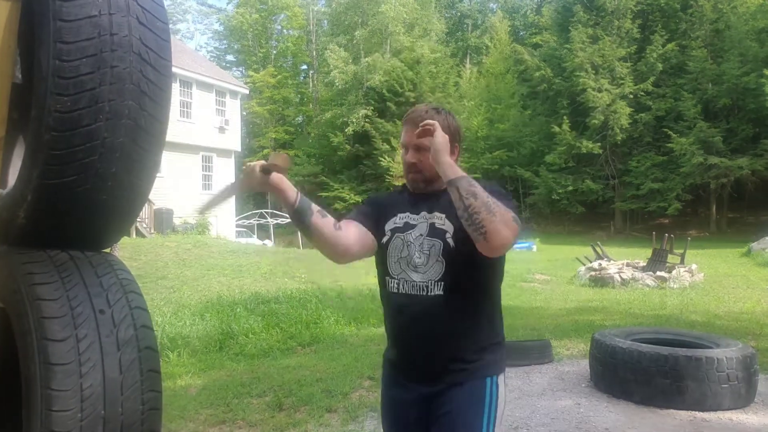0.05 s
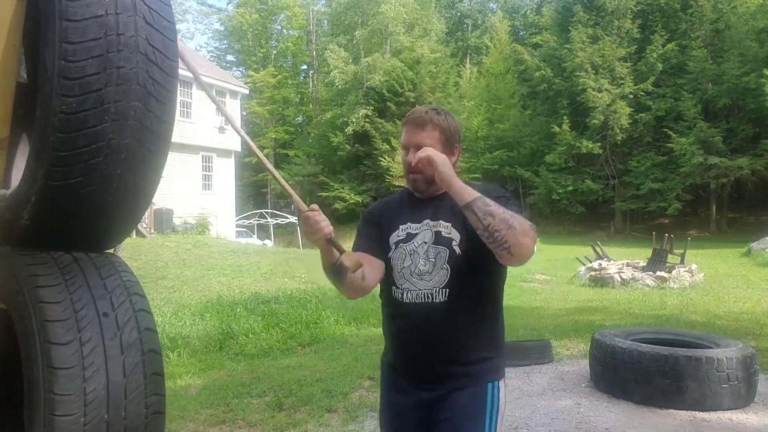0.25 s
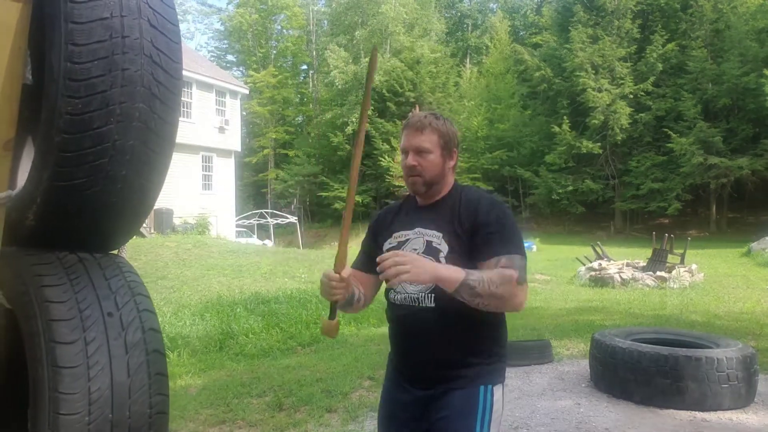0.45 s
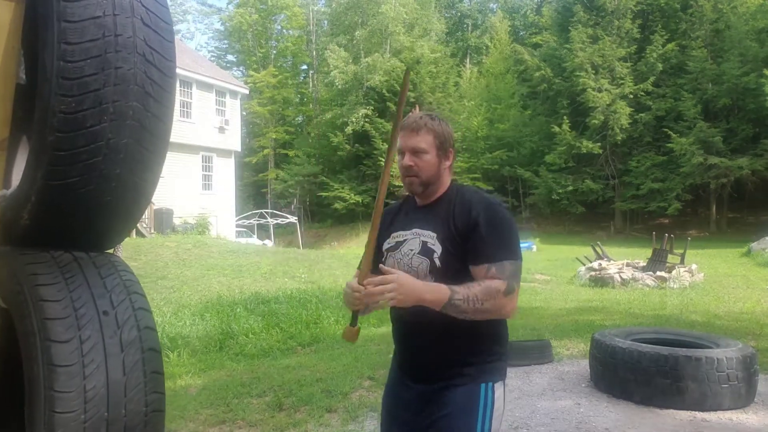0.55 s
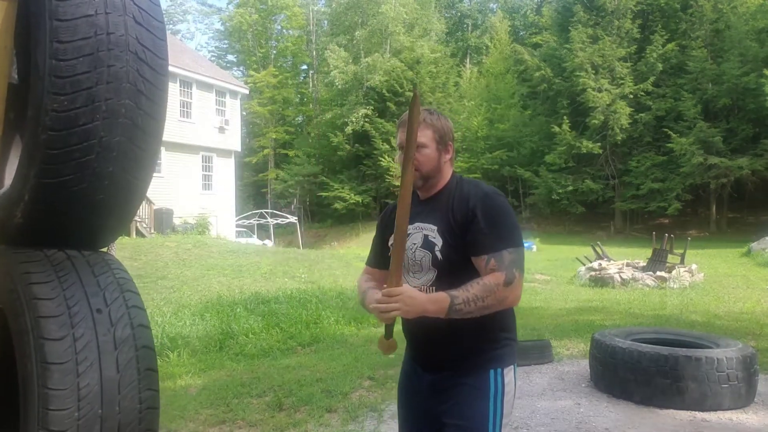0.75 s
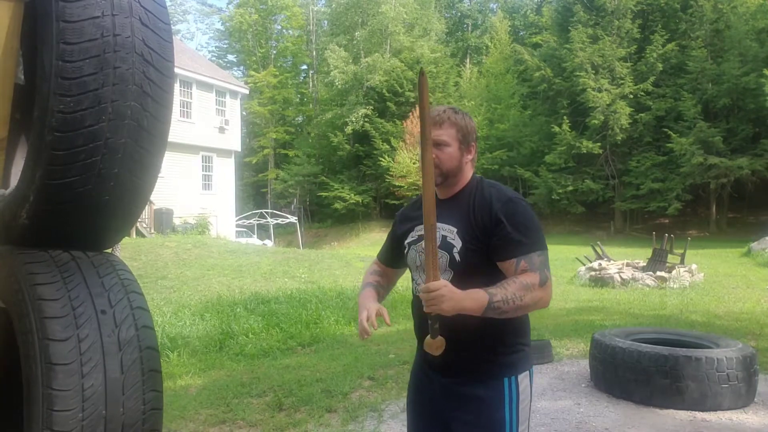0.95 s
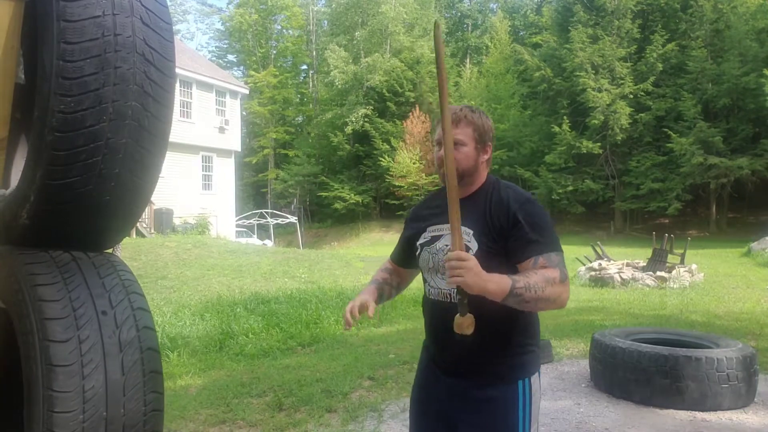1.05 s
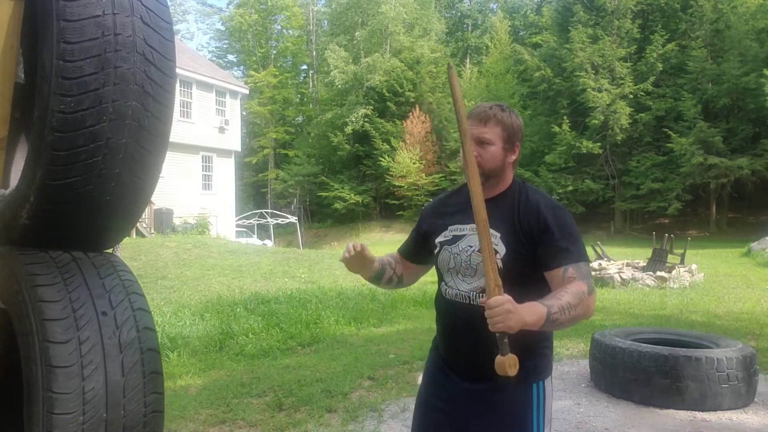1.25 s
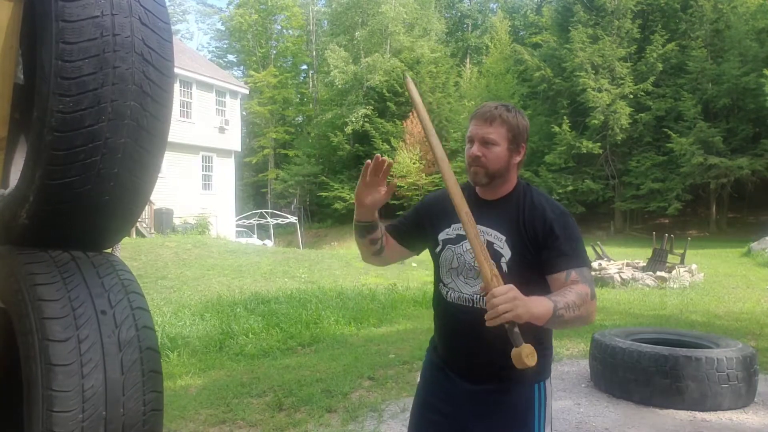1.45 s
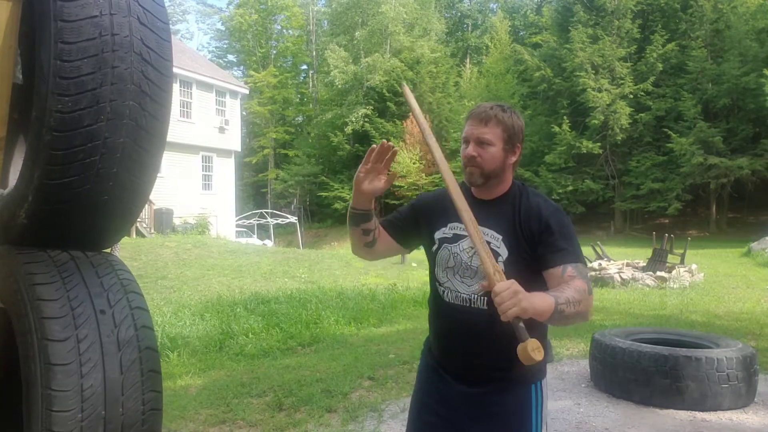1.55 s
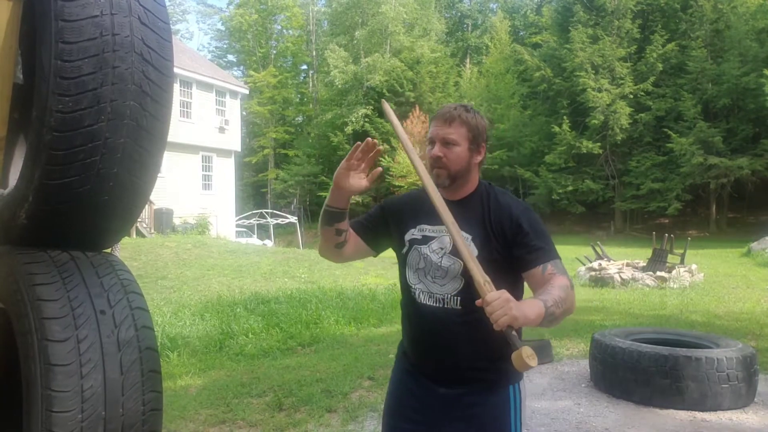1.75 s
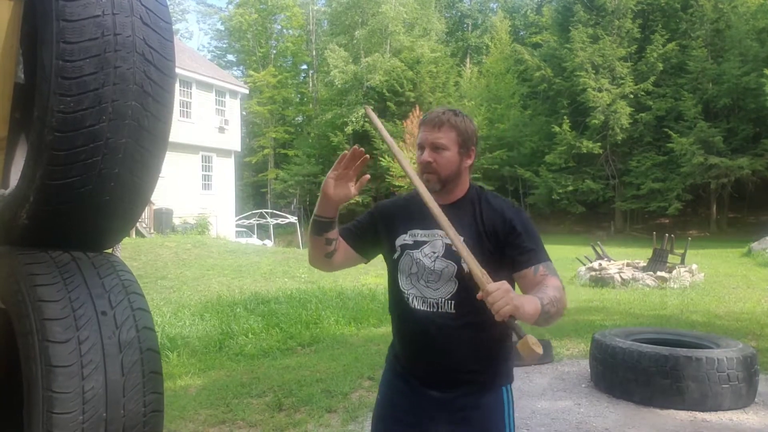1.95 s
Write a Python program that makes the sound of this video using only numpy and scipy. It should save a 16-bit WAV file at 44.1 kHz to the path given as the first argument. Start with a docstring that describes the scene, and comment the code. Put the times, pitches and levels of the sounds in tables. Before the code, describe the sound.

One close, dull thud of a wooden sword on a tire outdoors, then faint shoe scuffs.

```python
"""Wooden sword on a stack of tires

Out in a yard, close to the microphone, a wooden sword strikes a stack of tires: one dull thud that
overloads it. The blow rings briefly, and a house and a line of trees throw it back.
Then faint shoe scuffs, grit ticks and rustling clothes over quiet outdoor air."""
import sys
import numpy as np
from scipy import signal
from scipy.fft import rfft, irfft
from scipy.io import wavfile

SR = 44100
rng = np.random.default_rng(int(sys.argv[2]) if len(sys.argv) > 2 else 0)


def waveform_to_disk(signal):
    """Save audio, clipped to [-1, 1], as 16-bit WAV at the path in sys.argv[1]."""
    frames = np.transpose(np.atleast_2d(signal))
    scaled = np.clip(frames, -1, 1) * 32767
    samples = np.round(scaled).astype(np.int16)
    wavfile.write(sys.argv[1], SR, samples)


N = 88200

# How alike the two sides of the microphone are. Each row: frequency in Hz, coherence.
COHERENCE = [(60, 0.72), (130, 1), (300, 0.71), (640, 0.18), (1400, 0.055), (16000, 0.079)]
# Tone of the open air, of shoes on grit and of the swish and rustles.
# Each row: frequency in Hz, relative level in dB.
AIR_SPECTRUM = [(20, -26), (40, -12.5), (58, 0), (80, -10), (120, -13.5), (220, -22), (600, -22),
                (1300, -28.5), (2500, -29.5), (5000, -27), (7600, -26), (8300, -34.5), (15500, -35)]
SCUFF_SPECTRUM = [(100, -21), (400, -4), (1000, 3.5), (3000, -1), (7500, -5.5), (9000, -13.5), (13000, -16),
                  (16000, -25)]
RUSTLE_SPECTRUM = [(100, -2.5), (300, -8), (650, 4), (1400, 0), (2400, 2), (3600, -2.5), (7500, -1.5),
                   (9000, -9), (16000, -1.5)]
# Shoe scuffs and ticks of grit. Each row: start in seconds, length in seconds, level in dB,
# centre of the rasp or ping in Hz, its boost in dB, treble tilt in dB per octave.
SHOE_SCUFFS = [(0.043, 0.046, -70, 820, 23.5, 3), (.793, 0.012, -53, 1960, 11, -2.5),
               (1.026, 0.046, -52, 2600, 13.5, 0.5), (1.4025, 0.0036, -58, 2270, 13, -2),
               (1.94, 0.022, -60, 2470, 2, 3.5), (1.954, 0.026, -56, 2450, 5.5, 2)]
GRIT_TICKS = [(0.15, 0.012, -70, 2520, 12, -2), (0.665, 0.0028, -65.5, 7000, 7, 7),
              (0.692, 0.0053, -60, 2800, 12, -4.5), (.7305, 0.012, -60, 2350, 15, 1.5),
              (.7405, 0.0029, -82, 4500, 3, 9), (0.7606, 0.0093, -51, 453, 28, 1.7),
              (0.9866, 0.0062, -60, 2030, -2, -6.5), (1.279, 0.013, -59.5, 4580, 4, 6.5)]
# A faint swish leading into the blow, then clothes and shifting feet.
# Each row: start in seconds, length in seconds, level in dB, treble tilt in dB per octave.
SWISH_AND_RUSTLES = [(.215, 0.08, -67.5, -4.5), (0.678, 0.24, -64.5, -3), (0.765, 0.077, -59, -4),
                     (1.033, 0.18, -68.5, -2.5), (1.277, .05, -67, 2), (1.383, 0.14, -68, -1),
                     (1.657, 0.15, -72.5, -5), (1.951, .09, -70, 0)]
# House and trees across the yard. Each row: delay in seconds, spread in seconds, level in dB.
YARD_ECHOES = [(.105, 0.038, -33), (0.236, .075, -41)]
# Tone of those echoes, of the slap's tail in the yard, of its scatter off nearby tires and ground,
# and of the slap itself. Each row: frequency in Hz, relative level in dB.
ECHO_SPECTRUM = [(40, 0.5), (85, 9), (170, -4), (280, -3.5), (420, -2), (900, 3.5), (3000, -0.5),
                 (8000, -15), (16000, -21)]
TAIL_SPECTRUM = [(60, -8), (200, -6.5), (450, 5.5), (900, -7), (1700, -8.5), (3300, -13.5), (5200, -20),
                 (7200, -14), (9000, -20.5), (15500, -21)]
SCATTER_SPECTRUM = [(100, -8), (450, 3.5), (800, -2), (1500, -2), (2300, -9.5), (3200, -8.5), (5200, -21),
                    (7000, -16.5), (9000, -21.5), (15500, -24.5)]
SLAP_SPECTRUM = [(100, -15), (600, -6.5), (1050, -6.5), (1600, 11), (2000, 0), (2700, -2), (4000, -4.5),
                 (5500, -16), (6900, 1.5), (8200, -15), (11000, -28.5), (16000, -34.5)]
# How long the yard holds the slap. Each row: frequency in Hz, seconds to fall 60 dB.
TAIL_DECAY = [(100, .55), (500, .88), (1100, 0.61), (3000, 0.68), (7000, .43), (15000, .34)]
# Ringing tones of the blow, and one faint tone at 397 Hz lingering in the yard. Each row:
# frequency in Hz, level in dB, seconds to fall 60 dB, build-up in seconds, left over right in dB.
RING_TONES = [(67.15, -19.5, 0.16, 0.0015, -5.5), (85.55, -28, 0.48, 0.018, -2),
              (127, -12, 0.051, .016, -2), (192.8, 7, 0.048, .009, -3.5), (219, -7, .07, .003, 1),
              (280.8, -2, .078, .0006, 1), (345, -10.5, .062, .0005, -5), (391.2, -4, .124, .0006, -11),
              (397, -40.5, 0.77, .03, -9.5), (482, -20.5, 0.13, .003, -5), (551, -16, 0.28, .003, 2),
              (648.7, -20.5, 0.066, .002, -12.5), (717, -40, .2, .002, -9),
              (903.4, -41.5, .34, 0.00209, -3.5), (994, -34.5, 0.0794, .004, -5),
              (1081, -31.5, 0.23, .004, -10), (1264, -32, .07, .003, 1), (1387, -28.5, 0.089, .003, -0.5),
              (1417, -53, 0.52, .001, -3), (1517, -46, .33, .001, 0.5), (1623, -29, .08, .001, 11),
              (1810, -45.5, 0.13, 0.00087, -0.5), (2038, -40.5, .14, 0.00044, 1),
              (2216, -34.5, .15, 0.00078, 0.5), (2546, -34.5, .1, .001, -1.5), (2884, -37, 0.086, .001, -2)]
# The blow and its soft rebound. Each row: time in seconds, level in dB, contact time in seconds.
CONTACTS = [(.2466, 1, 0.00032), (0.2646, -11, .0011)]

DRONE_HZ, DRONE_WAVER = 58, .3
SLIPS_PER_S, SLIP_SPREAD_DB, RASP_OCTAVES = 11000, 2, .15
CRACK_T60_S, SCATTER_T60_S, SLAP_LEAD_S = .018, .15, .0005
LOW_CUT_HZ, OVERLOAD_KNEE, CUTOFF_HZ = 38, 14, 15900
TIME, BIN_HZ = np.arange(N) / SR, np.fft.rfftfreq(N, 1 / SR)


def amp(db):
    """Decibels to gain."""
    return 10 ** (np.asarray(db) / 20)


def unit(x):
    """Scales to rms 1."""
    return x / np.sqrt(np.mean(x ** 2) + 1e-20)


def curve(points, hz=BIN_HZ):
    """Interpolates a table on a log-frequency axis."""
    f, value = np.transpose(points)
    return np.interp(np.log(hz + 1), np.log(f + 1), value)


def pan(db):
    """Channel gains that put the left db above the right."""
    gains = amp(np.array([[db], [-db]]) / 2)
    return gains / gains.mean()


def add(mix, start, sound):
    """Mixes a sound in at a start in seconds."""
    part = mix[:, max(round(start * SR), 0):][:, :sound.shape[1]]
    part += sound[:, :part.shape[1]]


def colour(x, gain_db):
    """Filters two channels and makes their bass alike, as at two close microphone ports."""
    right, other = rfft(x)
    alike = np.clip(curve(COHERENCE), -1, 1)
    left = alike * right + np.sqrt(1 - alike ** 2) * other
    return unit(irfft(np.array([left, right]) * amp(gain_db), N))


def noise(spectrum):
    """Stereo noise of a given spectrum."""
    return colour(rng.standard_normal((2, N)), curve(spectrum))


def air():
    """Soft outdoor hiss and a low, wavering drone, off to the right."""
    waver = unit(sum(np.cos(2 * np.pi * (hz * TIME + rng.random())) for hz in rng.uniform(-12, 9, 20)))
    phase = 2 * np.pi * DRONE_HZ * TIME + DRONE_WAVER * waver[::-1]
    drone = np.sqrt(2) * (1 + DRONE_WAVER * waver) * np.sin(phase)
    return pan(-6) * (amp(-67) * noise(AIR_SPECTRUM) + amp(-74.5) * drone)


def rub(length, db, gain_db):
    """A swell of tiny slips of uneven size, a little right of centre."""
    slips = rng.standard_normal((2, N)) * amp(SLIP_SPREAD_DB * np.minimum(rng.exponential(1, (2, N)), 4))
    slipping = rng.random((2, N)) < SLIPS_PER_S / SR
    grains = colour(slips * slipping, gain_db)
    progress = np.arange(0, length, 1 / SR) / length
    swell = np.sqrt(2) * np.sin(np.pi * progress ** .8)
    return pan(-3) * amp(db) * swell * unit(grains[:, :len(swell)])


def movement():
    """Shoes scuff and tick on grit; a faint swish leads into the blow and clothes rustle after it."""
    out = np.zeros((2, N))
    octaves = np.log2(np.maximum(BIN_HZ, 400) / 2000)  # the tilt pivots at 2 kHz
    for start, length, db, rasp_hz, rasp_db, tilt in SHOE_SCUFFS + GRIT_TICKS:
        rasp = rasp_db * np.exp(-(np.log2((BIN_HZ + 1) / rasp_hz) / RASP_OCTAVES) ** 2 / 2)
        add(out, start, rub(length, db, curve(SCUFF_SPECTRUM) + rasp + tilt * octaves))
    for start, length, db, tilt in SWISH_AND_RUSTLES:
        add(out, start, rub(length, db, curve(RUSTLE_SPECTRUM) + tilt * octaves))
    return out


def echoes(blow):
    """From across the yard, house and trees return the blow as smeared clouds of reflections."""
    clouds = sum(amp(db) * unit(np.exp(-((TIME - delay) / spread) ** 2))
                 for delay, spread, db in YARD_ECHOES)
    reflections = clouds / np.sqrt(N) * noise([(20, 0), (20000, 0)])
    response = irfft(rfft(reflections) * amp(curve(ECHO_SPECTRUM)), N)
    return pan(-3.5) * signal.fftconvolve(blow.mean(0)[None], response, axes=1)[:, :N]


def slap():
    """Wood cracks on rubber close on the left, scatters nearby and dies away in the yard."""
    crack = pan(6) * amp(-18 - 60 * TIME / CRACK_T60_S) * noise(SLAP_SPECTRUM)
    scatter = pan(-5.5) * amp(-27.5 - 60 * TIME / SCATTER_T60_S) * noise(SCATTER_SPECTRUM)
    hz, age, bands = signal.stft(noise(TAIL_SPECTRUM), SR, nperseg=256)
    decay = amp(-60 * age / curve(TAIL_DECAY, hz)[:, None])
    tail = pan(-5.5) * amp(-38) * signal.istft(bands * decay, SR, nperseg=256)[1][:, :N]
    touch = CONTACTS[0][0] - SLAP_LEAD_S  # wood meets the tread just before the rubber gives
    out = np.zeros((2, N))
    add(out, touch, crack + scatter + tail)
    return out


def thud():
    """Close up, each contact is a short push that starts the ringing; one tone lingers in the yard."""
    t, out = TIME[:SR], np.zeros((2, N))
    ring = np.zeros((2, SR))
    for hz, db, t60, rise, side_db in RING_TONES:
        envelope = amp(db - 60 * t / t60) * (1 - np.exp(-t / rise))
        ring += pan(side_db) * envelope * np.cos(2 * np.pi * hz * t)
    for when, db, contact in CONTACTS:
        push = np.sin(np.pi * np.arange(0, contact, 1 / SR) / contact) ** 2
        struck = signal.fftconvolve(ring, push[None] / push.sum(), axes=1)
        add(out, when - contact / 2, amp(db) * struck)
    return out


def scene():
    """The yard as it reaches the microphone: the close blow, its echoes, faint movement and air."""
    blow = thud() + slap()
    return blow + echoes(blow) + movement() + air()


def record(dry):
    """The recorder sheds the lowest rumble, flattens the highest peaks, then limits the band."""
    x = signal.sosfilt(signal.butter(1, LOW_CUT_HZ, "high", fs=SR, output="sos"), dry)
    clipped = x / (1 + abs(x) ** OVERLOAD_KNEE) ** (1 / OVERLOAD_KNEE)
    lowpass = signal.firwin(511, CUTOFF_HZ, window=("kaiser", 9), fs=SR)
    return signal.oaconvolve(clipped, lowpass[None], "same")


dry = scene()
out = record(dry)
waveform_to_disk(out)
```